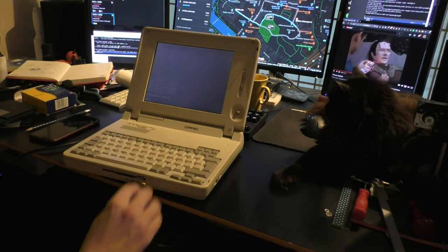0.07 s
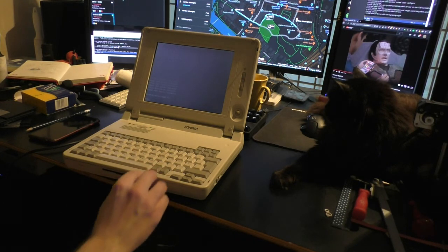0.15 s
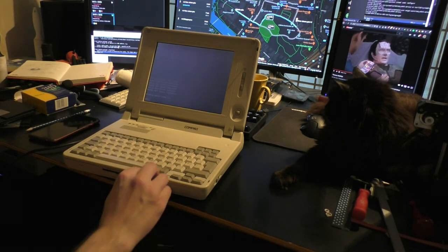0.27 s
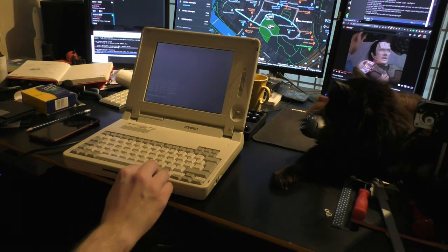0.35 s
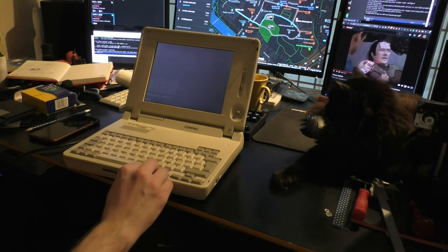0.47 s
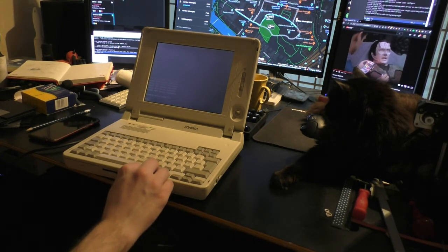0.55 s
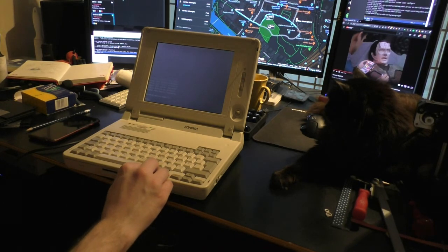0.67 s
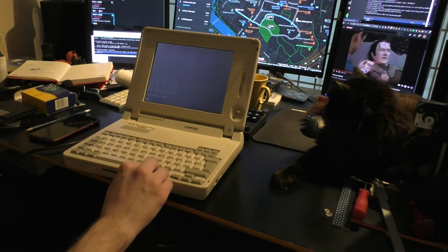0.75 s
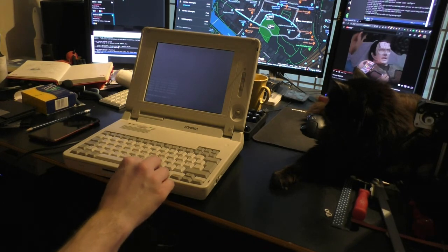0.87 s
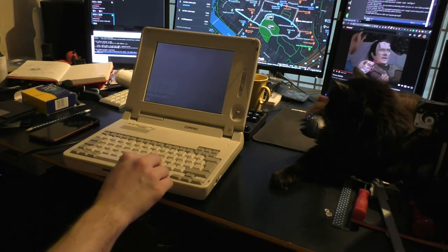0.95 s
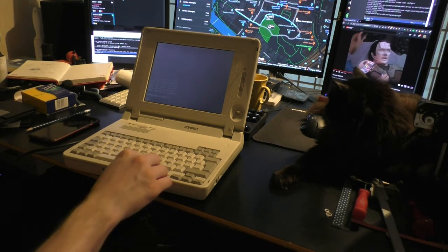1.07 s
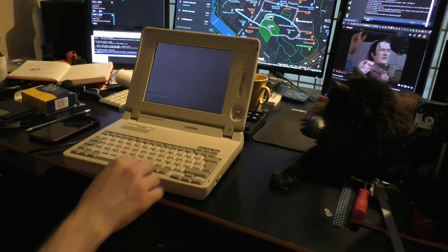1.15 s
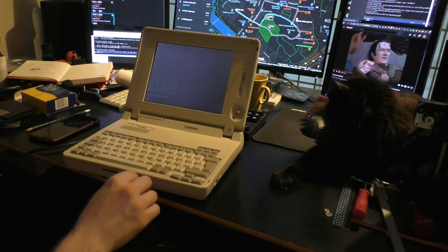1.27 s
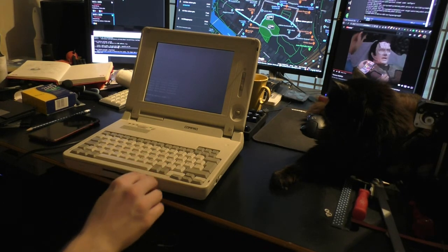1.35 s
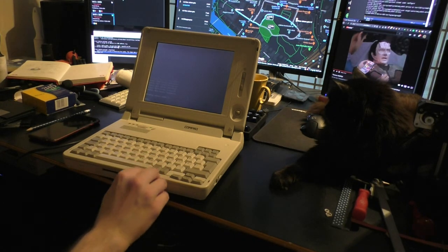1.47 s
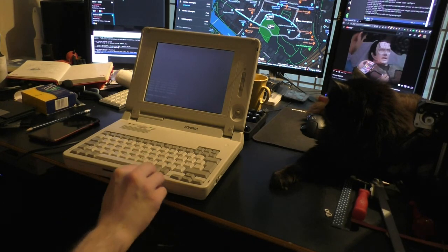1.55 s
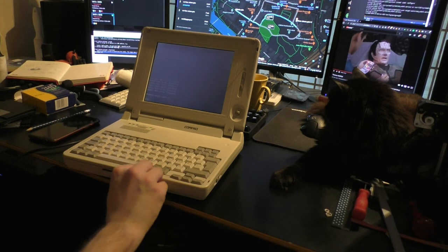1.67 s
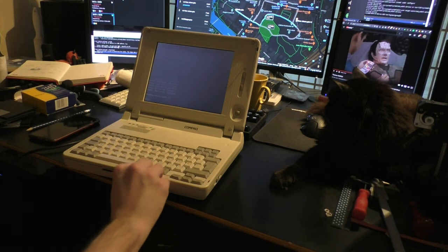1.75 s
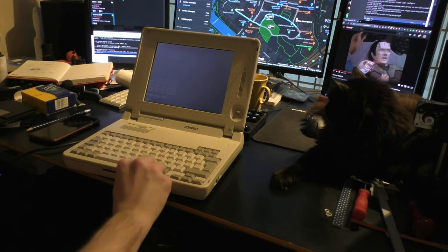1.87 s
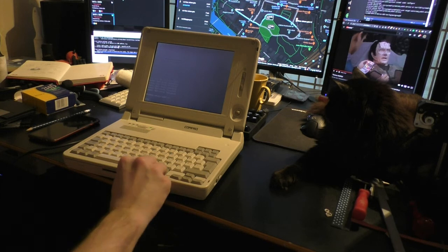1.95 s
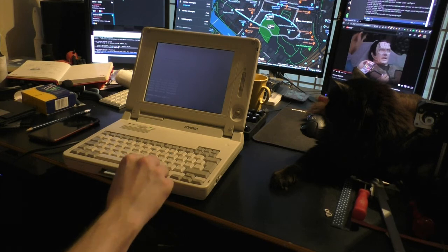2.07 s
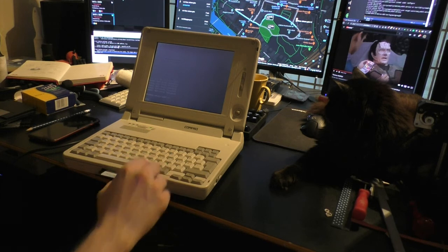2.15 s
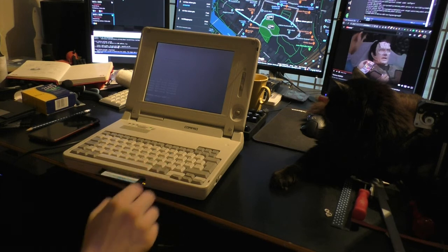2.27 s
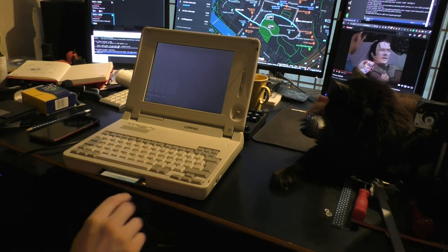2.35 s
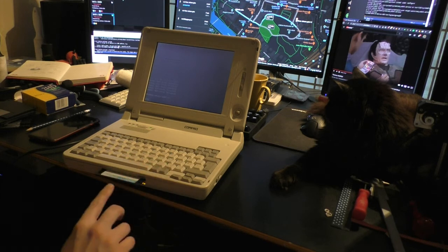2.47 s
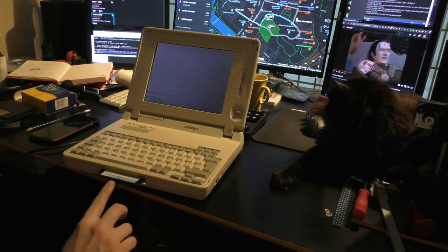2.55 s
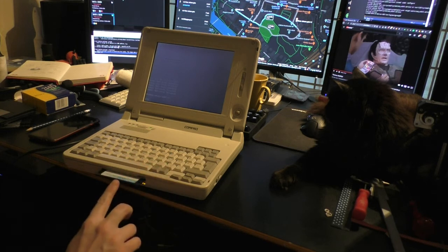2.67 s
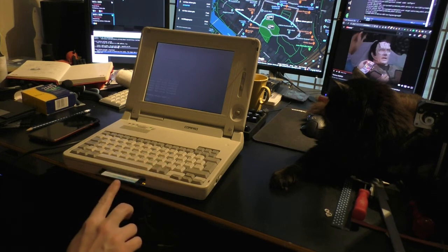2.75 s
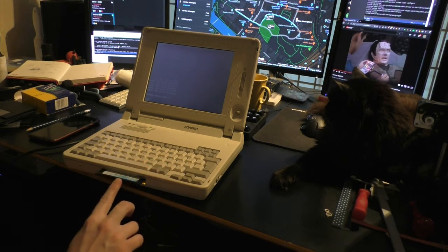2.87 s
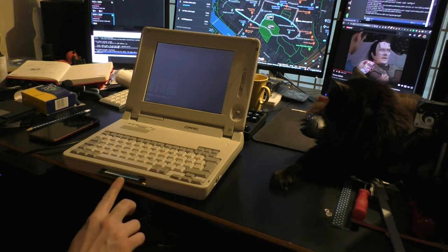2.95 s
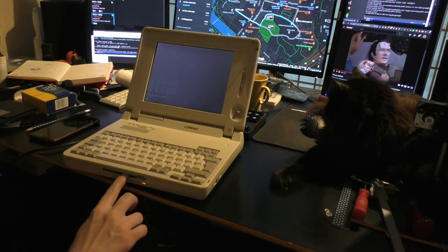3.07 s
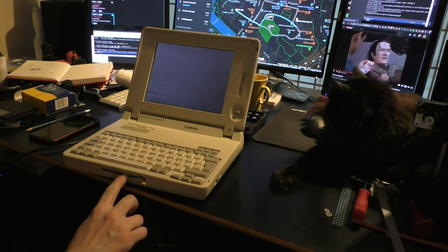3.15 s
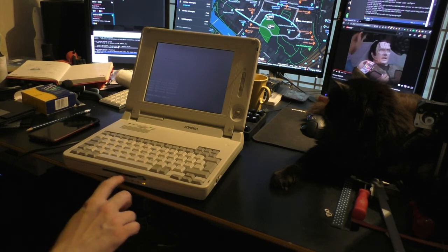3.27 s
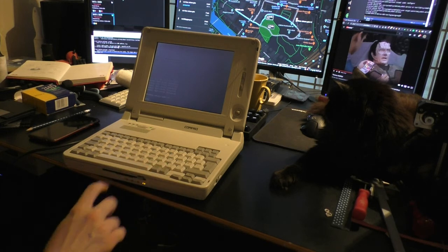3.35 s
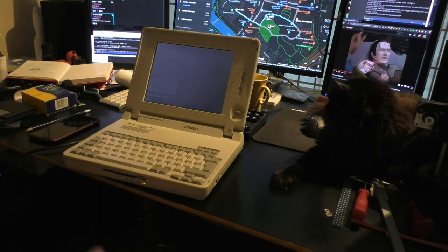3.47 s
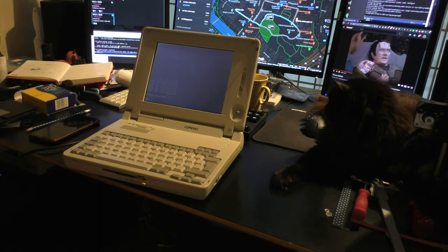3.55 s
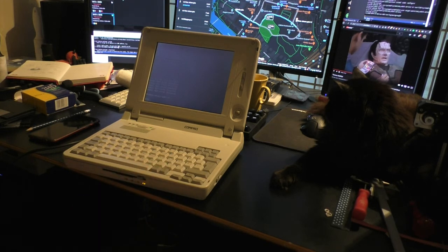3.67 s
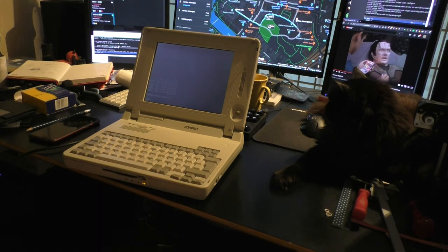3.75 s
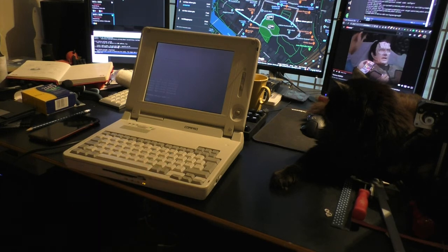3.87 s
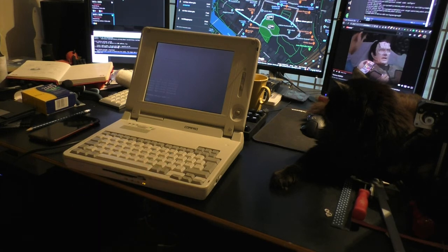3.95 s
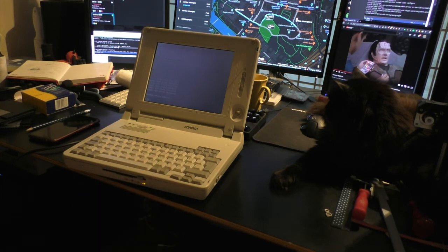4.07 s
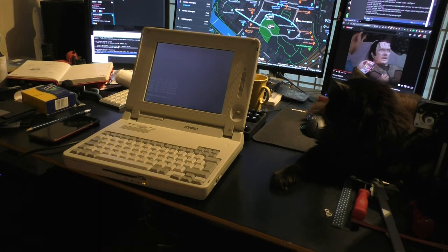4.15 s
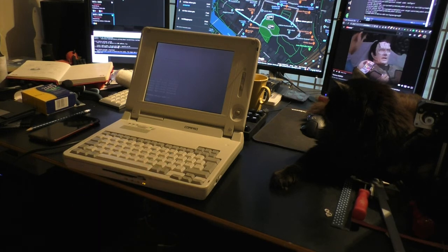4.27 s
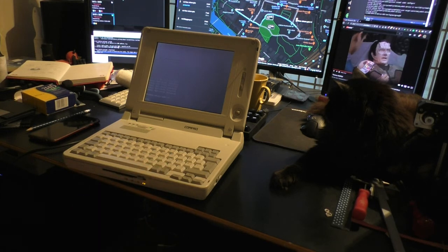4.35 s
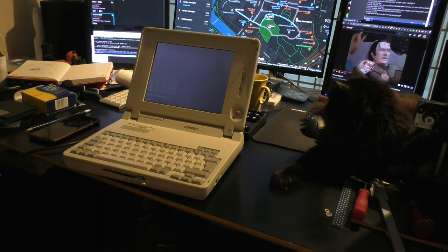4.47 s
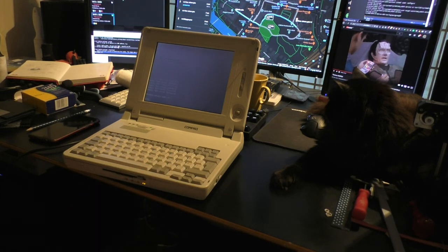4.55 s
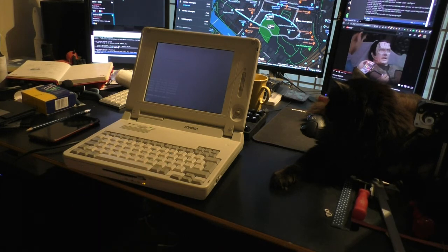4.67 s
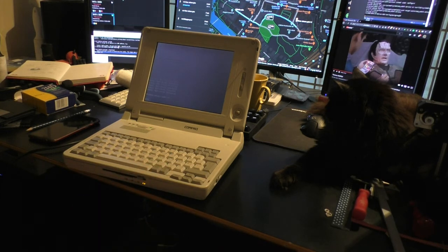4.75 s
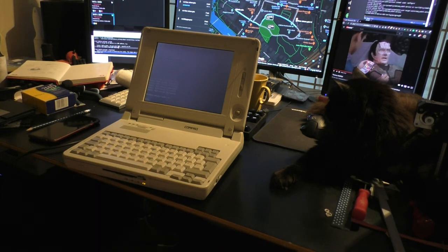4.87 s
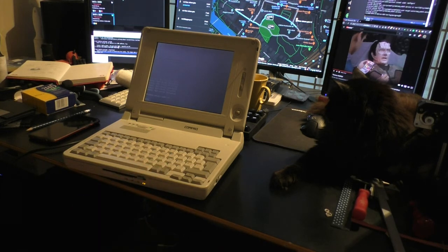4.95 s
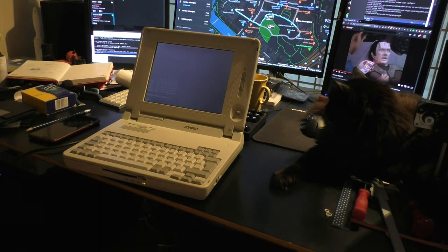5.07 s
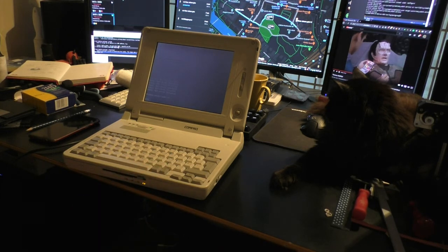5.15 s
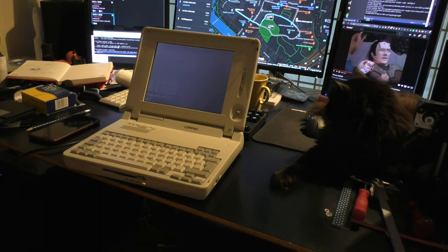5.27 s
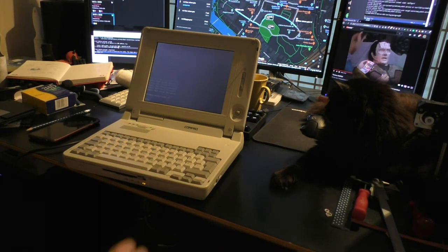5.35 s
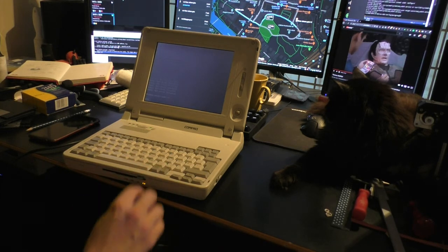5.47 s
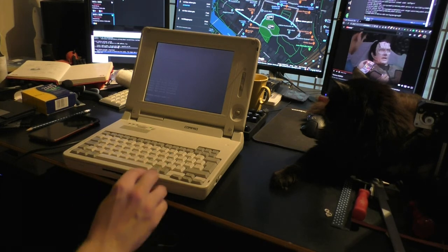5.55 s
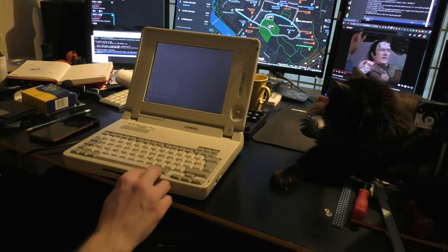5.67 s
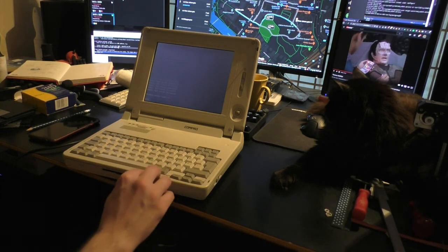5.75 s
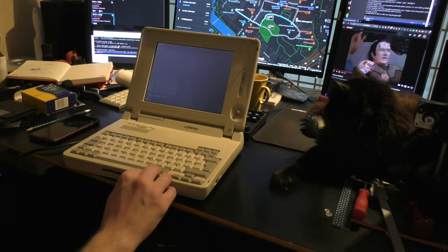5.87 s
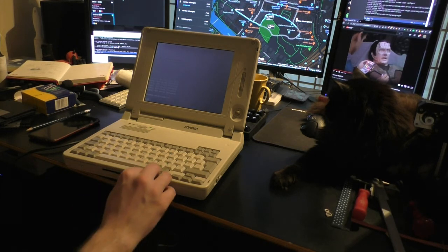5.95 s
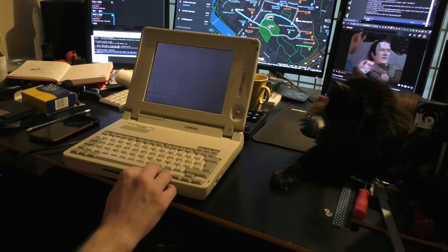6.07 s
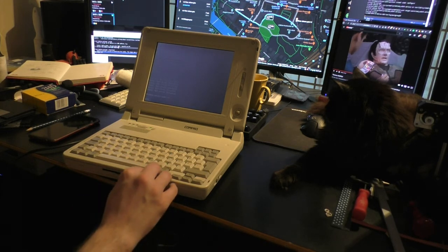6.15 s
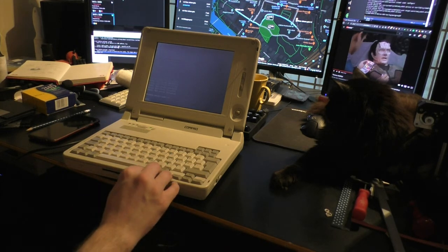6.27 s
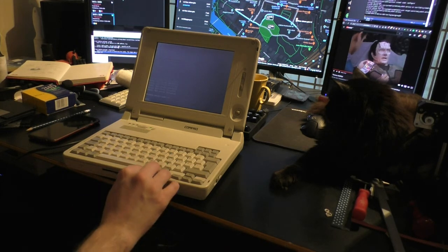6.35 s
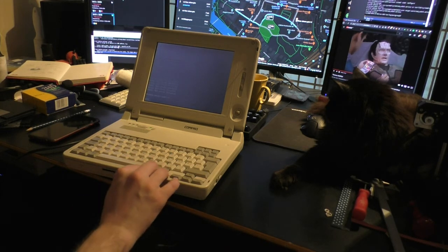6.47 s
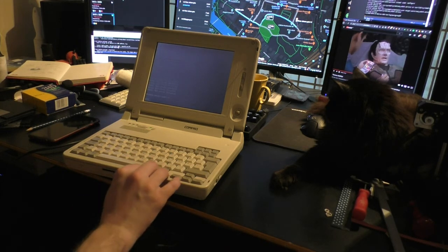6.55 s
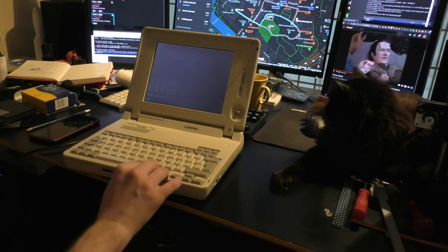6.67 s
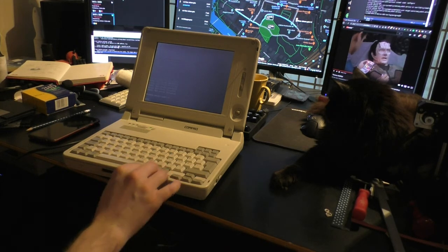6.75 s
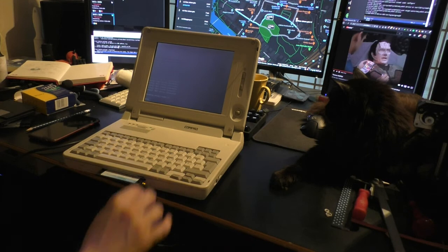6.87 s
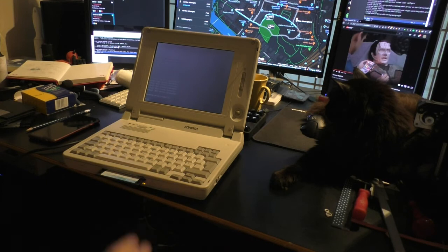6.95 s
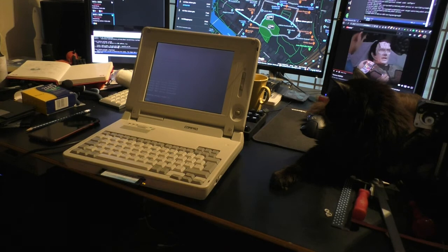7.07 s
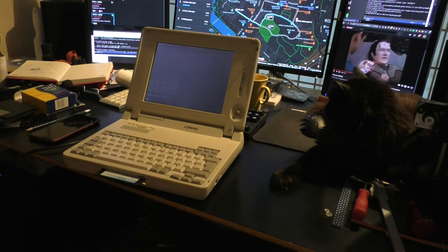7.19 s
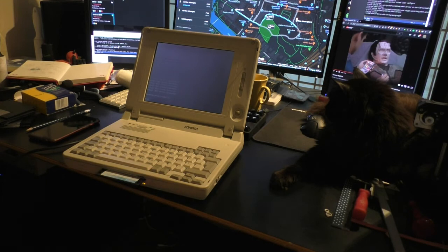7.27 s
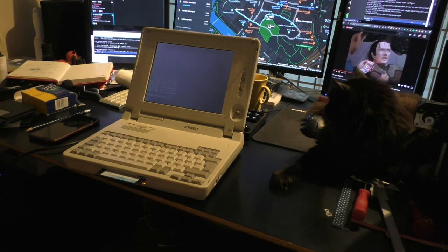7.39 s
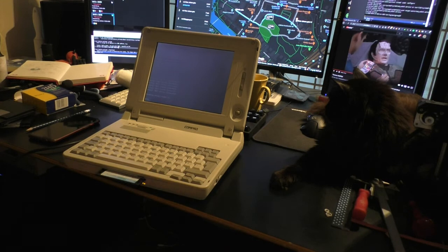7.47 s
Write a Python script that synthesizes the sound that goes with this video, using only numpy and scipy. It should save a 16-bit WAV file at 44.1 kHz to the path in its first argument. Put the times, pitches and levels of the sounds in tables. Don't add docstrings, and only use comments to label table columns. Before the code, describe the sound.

In a quiet room with soft fans, a close microphone catches an old laptop's floppy drive whining and rasping. It cuts off and coasts down after an eject; small clicks, a press and a short plastic slide follow. The disk is pushed back with a hard clack and desk thump, the drive whines and scrapes again for over three seconds, then stops with a click and a few light taps.

```python
import sys
import numpy as np
from scipy import signal
from scipy.fft import rfft, irfft, next_fast_len
from scipy.io import wavfile
from scipy.ndimage import uniform_filter1d

SR = 44100
rng = np.random.default_rng(int(sys.argv[2]) if len(sys.argv) > 2 else 0)


def amplitude_ratio(level_db):
    exponent = np.asarray(level_db, float) / 20
    return 10 ** exponent


def wrap_up_sound(samples):
    columns = np.atleast_2d(samples).T
    tamed = np.clip(columns, -1, 1)
    steps = np.round(tamed * 32767).astype(np.int16)
    wavfile.write(sys.argv[1], SR, steps)


N = 331632


def rms_one(x):
    return x / np.sqrt(np.mean(x ** 2) + 1e-20)


def at_hz(points, hz):
    table_hz, values = np.array(points)[:, :2].T
    return np.interp(np.log(hz + 1e-9), np.log(table_hz), values)


def drift(rate_hz):
    r = np.exp(-80 * np.pi * rate_hz / SR)
    slow = signal.lfilter([1], [1, -2 * r, r * r], rng.standard_normal(N // 40 + 2002))[2000:]
    return np.interp(np.arange(N) / 40, np.arange(len(slow)), rms_one(slow))


def colour(x, points, scale=1):
    gain = amplitude_ratio(scale * at_hz(points, np.fft.rfftfreq(N, 1 / SR)))
    return irfft(rfft(x) * gain, N)


def butter(x, order, hz, kind="low"):
    return signal.sosfilt(signal.butter(order, hz, kind, fs=SR, output="sos"), x)


def resonate(x, modes, patchy_db=0):
    out = np.zeros(N)
    for k, (hz, width, db) in enumerate(modes):
        r = np.exp(-np.pi * width / SR)
        poles = [1, -2 * r * np.cos(2 * np.pi * hz / SR), r * r]
        ring = signal.lfilter([(1 - r * r) / 2, 0, (r * r - 1) / 2], poles, x + 1e-18)
        out += (-1) ** k * amplitude_ratio(db + patchy_db * drift(7.9)) * ring
    return out


# (time [s], pole rate [Hz], whine level [dB])
SPINDLE = [(0, 713, -45), (.35, 716.2, -42.5), (.72, 706, -46), (.86, 707.4, -46), (3.2, 663, -59),
           (3.26, 667.6, -49), (3.33, 705.5, -42.5), (3.62, 706, -42), (3.75, 711, -43), (3.95, 701, -42.5),
           (4.1, 710, -41), (4.3, 691.5, -42), (4.53, 714.3, -42), (4.68, 696, -41.5), (4.9, 725, -45),
           (5.2, 721, -45), (5.55, 707.8, -39.5), (6.57, 700.8, -44.5)]
# (from [s], to [s])
CURRENT = [
    (-1, .862),
    (3.2, 6.572),
]
# (time [s], loss [dB])
FALTERS = [
    (.73, 6.5),
    (5.17, 8.9),
    (6.19, 2.1),
]


def motor():
    t = np.arange(N) / SR
    s, table_hz, table_db = np.transpose(SPINDLE)
    turning = (t >= s[0]) & (t <= s[-1])
    pole_hz = np.where(turning, np.interp(t, s, table_hz), 662)
    whine_db = np.where(turning, np.interp(t, s, table_db), -130)
    live = sum(1. * ((t > on) & (t < off)) for on, off in CURRENT)
    whine_db = whine_db + 20 * np.log10(uniform_filter1d(live, size=500) + 1e-5)
    half_width_s = 0.015
    whine_db -= sum(db * np.exp(-((t - at) / half_width_s) ** 2) for at, db in FALTERS)
    return pole_hz, whine_db


JITTER_DB = [-56, -52.5, -52.5]
# (from [s], to [s], third partial [dB], fourth partial [dB])
SINGING = [(0.076, 0.113, -55, -46), (0.244, 0.322, -47, -46), (0.574, .63, -51, -48),
           (.75, 0.826, -45.5, -45), (3.198, 3.4, -46, -48.5), (3.396, 3.665, -45.5, -45.5),
           (3.72, 3.82, -46.5, -44.5), (3.887, 4.298, -48, -51), (4.329, 4.5, -45.5, -48),
           (4.557, 4.7, -47, -56), (5.45, 5.621, -50.5, -52), (5.74, 5.94, -51.5, -51),
           (6.32, 6.422, -45.5, -47), (6.484, 6.575, -47, -49)]


def partials(whine_db):
    t = np.arange(N) / SR
    edge_s, second_under_third_db = 0.01, 6.5
    second, third, fourth = [np.full(N, float(db)) for db in JITTER_DB]
    for start, end, third_db, fourth_db in SINGING:
        true = np.clip(np.minimum(t - start, end - t) / edge_s + .5, 0, 1)
        second += true * (third_db - second_under_third_db - JITTER_DB[0])
        third += true * (third_db - JITTER_DB[1])
        fourth += true * (fourth_db - JITTER_DB[2])
    dead = np.minimum(whine_db + 55, 0)
    singing_db = third - JITTER_DB[1]
    return second + dead, third + dead, fourth + dead, singing_db


# (from [s], pole rate [Hz], slowing time constant [s], level [dB])
COASTING = [
    (.862, 660, .24, -56),
    (6.575, 600, .17, -51),
]


def coasting():
    t, hz, db = np.arange(N) / SR, np.full(N, 400.), np.full(N, -120.)
    peak_s, rise_db, fade_db_per_s = .05, 7, 220
    for start, start_hz, slow_s, top_db in COASTING:
        age = t - start
        on = (age >= 0) & (age < .25)
        hz = np.where(on, start_hz * np.exp(-np.maximum(age, 0) / slow_s), hz)
        rise = rise_db * (age / peak_s - 1)
        fade = -fade_db_per_s * (age - peak_s)
        db = np.where(on, top_db + np.minimum(rise, fade), db)
    return hz, db


# (multiple of the pole rate, level against third and fourth [dB])
HIGH_PARTIALS = [(5, -7), (6, -15), (7, -19)]
# (eighths of the pole rate, level against the third [dB])
SHAFT_ORDERS = [(17, -7), (21, -11), (22, -13), (25, -11), (29, -10), (37, -14)]


def whine(turn, whine_db, second_db, third_db, fourth_db):
    out = amplitude_ratio(whine_db + 0.72 * drift(29)) * np.sin(turn + 0.14 * drift(20))
    out += amplitude_ratio(third_db / 2 - 35 + 2 * drift(6)) * np.sin(1.5 * turn + .25 * drift(15))
    out += amplitude_ratio(second_db + 2.0 * drift(25)) * np.sin(2 * turn + .2 * drift(18))
    out += amplitude_ratio(third_db + 2.2 * drift(25)) * np.sin(3 * turn + .25 * drift(18))
    out += amplitude_ratio(fourth_db + 2.5 * drift(25)) * np.sin(4 * turn + .4 * drift(18))
    for k, db in HIGH_PARTIALS:
        level_db = (third_db + fourth_db) / 2 + db
        out += amplitude_ratio(level_db + 2.5 * drift(15)) * np.sin(k * turn + .5 * drift(20))
    fade = 1.5 * np.minimum(third_db + 45, 0)
    for eighths, db in SHAFT_ORDERS:
        level_db = third_db + db + fade
        out += amplitude_ratio(level_db + 1.5 * drift(15)) * np.sin(eighths / 8 * turn + .3 * drift(15))
    coast_hz, coast_db = coasting()
    coast_turn = 2 * np.pi * np.cumsum(coast_hz) / SR
    out += amplitude_ratio(coast_db + 2.5 * drift(40)) * np.sin(coast_turn + .6 * drift(40))
    return np.sqrt(2) * out


CLAMPED_S = [
    -2.5,
    3.105,
]
# (time [s], dying rate [dB/s])
LIFTS = [
    (.9, 85),
    (6.63, 119),
]
# (shortfall [dB], time constant [s])
SETTLING = [
    (4.64, 0.23),
    (22, 0.38),
    (14, 0.14),
]


def contact(singing_db):
    t, out = np.arange(N) / SR, np.full((3, N), -130.)
    full_db = np.array([[-41], [-48.5], [-52]])
    dies = np.array([[1], [0], [2.9]])
    short_db, settle_s = np.transpose(SETTLING)[:, :, None]
    for seated, (lifted, dying), (_, cut) in zip(CLAMPED_S, LIFTS, CURRENT):
        age = np.maximum(t - seated, 0)
        gone = dying * np.maximum(t - lifted, 0)
        db = full_db - short_db * np.exp(-age / settle_s) - gone * dies
        db[1] -= 150 * np.maximum(t - cut, 0)
        db[2] -= 2 * np.clip((t - lifted) / 0.98 + 1, 0, 1)
        out = np.where(t > seated, np.maximum(db, out), out)
    out[0] -= .3 * singing_db
    out[1] += 1.2 * drift(3) - 0.48 * singing_db
    return out


# (frequency [Hz], width [Hz], level [dB])
FRAME_MODES = [(1325, 35, -6), (1430, 50, -8), (1750, 45, -6), (1925, 50, -6), (2250, 70, -12),
               (2398, 28, 2), (2547, 28, 1), (2720, 60, -10), (2930, 60, -8), (3150, 70, -9),
               (3340, 50, -8), (3590, 60, -7), (5110, 200, -16), (6500, 300, -20)]
# (frequency [Hz], width [Hz], level [dB])
PLATE_MODES = [(1050, 36, 7), (1088, 68, 5), (1150, 76, 0.5)]
# (frequency [Hz], width [Hz], level [dB])
DESK_HUM_MODES = [(124, 14, 2), (200, 45, -4), (370, 18, -1), (536, 28, -5)]
# (frequency [Hz], density [dB per Hz])
RASP_SPECTRUM = [(900, -58), (1100, -24), (1600, -11), (2500, -8.5), (3600, -11.5), (5000, -17),
                 (7500, -26.5), (9000, -29.5)]
# (frequency [Hz], density [dB per Hz])
HISS_SPECTRUM = [(4500, -17), (5500, -19), (6500, 9.5), (7600, -1.5), (9000, -2), (11000, 0.5),
                 (14000, -0.5), (16500, -21)]


def rub(turn, singing_db):
    rasp_db, plate_db, hiss_db = contact(singing_db)
    sizes = amplitude_ratio(0.9 * np.minimum(rng.exponential(1, N), 5)) * rng.choice([-1, 1], N)
    strikes = rng.random(N) < 6000 / SR
    grains = sizes * strikes * (1 + 0.033 * np.cos(turn / 2)) * amplitude_ratio(0.98 * drift(13.7))
    rasp = resonate(grains, FRAME_MODES, patchy_db=2.5) + amplitude_ratio(1.5) * colour(grains[::-1], RASP_SPECTRUM)
    rasp = rms_one(butter(rasp, 6, 1000, "high"))
    plate = rms_one(butter(resonate(grains, PLATE_MODES, patchy_db=0.5), 6, 1000, "high"))
    hump_hz = 11430 + 301 * drift(1.5)
    band = rms_one(butter(rng.standard_normal(N), 2, 900))
    hump = band * np.cos(2 * np.pi * np.cumsum(hump_hz) / SR)
    hiss = rms_one(rms_one(colour(grains, HISS_SPECTRUM)) + amplitude_ratio(-2.5) * hump)
    hum = amplitude_ratio(-21.0) * rms_one(resonate(grains, DESK_HUM_MODES, patchy_db=-0.5))
    return amplitude_ratio(rasp_db) * (rasp + hum) + amplitude_ratio(plate_db) * plate + amplitude_ratio(hiss_db) * hiss


# (time [s], peak level [dB], shell centre [Hz], t60 [s])
FINGER_PRESSES = [(1.447, -50, 1220, .11), (1.825, -42, 945, 0.16), (1.87, -32, 1270, 0.035),
                  (3.095, -19.5, 1530, 0.035), (3.144, -41, 1329, .15), (6.821, -45, 1780, 0.14)]
DISK_CLACKS = [(1.875, -24.5, 1000, 0.061), (1.882, -28.5, 2100, 0.049), (1.879, -30, 3700, 0.053),
               (2.138, -41, 3470, 0.043), (2.908, -43, 1050, 0.06), (2.932, -39.5, 1600, 0.17),
               (3.053, -38, 1150, .067), (3.071, -29.5, 1840, 0.088), (3.092, -17, 3140, 0.05),
               (6.888, -58, 1350, .097), (7.097, -46.5, 1890, .04)]
EJECT_LEVER = [(1.016, -38.5, 1050, 0.19), (1.741, -35, 1730, 0.096), (1.888, -39.5, 2540, 0.27),
               (2.017, -39.5, 2880, 0.022), (2.023, -42.5, 2030, .21), (2.096, -45.5, 1080, 0.43),
               (6.615, -40.5, 2400, 0.21), (6.625, -27.5, 2280, 0.05)]
SHUTTER_SNAPS = [(2.13, -31, 2270, 0.14), (3.086, -15.5, 1340, 0.058), (3.117, -34, 1310, 0.26),
                 (6.596, -44, 2690, 0.041), (6.858, -34, 2060, 0.19)]
SOFT_TAPS = [(0.926, -39, 1300, 0.21), (1.573, -44.5, 1110, 0.2), (2.867, -46, 1830, 0.43),
             (7.231, -43, 1010, 0.085), (7.237, -40.5, 1230, 0.12)]
# (treble level [dB], bass level [dB])
KIND_COLOURS = [
    (-14.5, -8.5),
    (-15.5, -27),
    (-9.5, -15),
    (-2, -24.5),
    (-26, -10.5),
]


def strikes_on_case(contacts, flip):
    shell, crack, desk = np.zeros((3, N))
    t = np.arange(SR // 2) / SR
    kinds = [FINGER_PRESSES, DISK_CLACKS, EJECT_LEVER, SHUTTER_SNAPS, SOFT_TAPS]
    for rows, (treble_db, bass_db) in zip(kinds, KIND_COLOURS):
        for s, db, centre_hz, t60 in rows:
            at, t60 = round(s * SR), max(t60, .01)
            span = slice(at, at + len(t))
            attack = np.minimum(t * SR / 20, 1) * (1 + 0.49 * np.exp(-t / 0.0019))
            decay = amplitude_ratio(db - 60 * np.maximum(t / t60 - .06, 0))
            rattle = (attack * decay)[:N - at] * contacts[span]
            struck_part = butter(rattle, 2, [centre_hz / 1.94, centre_hz * 1.43], "band")
            shell[span] += struck_part * np.sqrt(8000 / centre_hz)
            crack[span] += rattle * amplitude_ratio(treble_db) * flip[span]
            desk[span] += rattle * amplitude_ratio(bass_db)
    return shell, crack, desk


# (from [s], to [s], level [dB], relative treble [dB])
SLOT_SLIDES = [
    (2.074, 2.125, -55, -7),
    (2.974, 3.078, -64, 1),
    (6.799, 6.87, -54.5, -3.5),
]


def slides(contacts, flip):
    shell, crack = np.zeros((2, N))
    for start, end, db, treble_db in SLOT_SLIDES:
        corners_s = [start, start + 0.33 * (end - start), end, end + 0.0029]
        stroke = np.interp(np.arange(N) / SR, corners_s, [0.01, 0.93, 1, 0.012])
        shell += amplitude_ratio(db + 17.5 + 2.0 * drift(60)) * stroke * contacts
        crack += amplitude_ratio(db + 10 + treble_db) * stroke * contacts * flip
    return shell, crack


# (time [s], level [dB])
DESK_BLOWS = [
    (1.574, 1),
    (1.877, 7),
    (2.133, 1),
    (3.094, 22.5),
    (3.132, 19.5),
    (7.233, -4),
]
# (frequency [Hz], width [Hz], level [dB])
DESK_TOP_MODES = [(95.5, 21, -18.5), (127.6, 9.9, 0), (174, 66, -16.5), (246, 71, -10.5)]


def thumps():
    push = np.zeros(N)
    for s, db in DESK_BLOWS:
        push[round(s * SR)] = amplitude_ratio(db)
    return resonate(butter(push + 1e-18, 2, 300), DESK_TOP_MODES)


# (frequency [Hz], width [Hz], level [dB])
SHELL_MODES = [(1030, 130, -1), (1270, 170, -2), (1730, 200, -3), (2090, 250, -1), (2450, 250, -2),
               (2900, 250, -1), (3330, 250, 0), (3800, 300, 0), (4400, 400, -3), (4850, 400, -4)]
# (frequency [Hz], width [Hz], level [dB])
DESK_MODES = [(188, 15, -2), (310, 85, -10.5), (380, 57, 5), (420, 180, 0), (680, 86, -4)]


def knocks():
    contacts = rng.standard_normal(N) * amplitude_ratio(3 * rng.standard_normal(N) + 1)
    flip = rng.choice([-1, 1], N)
    shell, crack, desk = strikes_on_case(contacts, flip)
    slide_shell, slide_crack = slides(contacts, flip)
    shell, crack = shell + slide_shell, crack + slide_crack
    broad = butter(shell, 2, [800, 5000], "band")
    crack = butter(butter(crack, 2, 3200, "high"), 1, 14000) * amplitude_ratio(1.5)
    out = amplitude_ratio(-1.5) * resonate(shell, SHELL_MODES) + amplitude_ratio(-17.5) * broad + amplitude_ratio(-5.5) * crack
    return out + amplitude_ratio(16.0) * resonate(desk, DESK_MODES) + thumps()


# (frequency [Hz], t60 [s])
ROOM_DECAY = [(100, 0.89), (1000, 0.61), (5000, 0.27), (15000, 0.062)]


def room(x):
    size = next_fast_len(N + SR)
    hz = np.fft.rfftfreq(size, 1 / SR)
    t60, sides = at_hz(ROOM_DECAY, hz), np.zeros((2, len(hz)), complex)
    for k, lag in enumerate(rng.uniform(.009, .035, 20)):
        echo = amplitude_ratio(-60 * lag / t60) * np.exp(-2j * np.pi * hz * lag)
        sides[k % 2] += echo / (1 - echo) * (-1) ** (k // 2)
    return irfft(rfft(x, size) * sides, size)[:, :N]


# (frequency [Hz], rms level [dB])
HARD_DISK_LINES = [(1211, -77), (1443, -73.5), (2396, -80), (2950, -90), (3015, -73), (3354, -75),
                   (4134, -75), (4172, -89), (4328, -96), (4441, -71.5), (4716, -78), (5254, -82),
                   (5523, -100), (6605, -81)]


def hard_disk():
    t, out = np.arange(N) / SR, np.zeros(N)
    fade_db = 4 * np.clip(t - 6, 0, 1)
    for hz, db in HARD_DISK_LINES:
        level = amplitude_ratio(db + 3 - fade_db + 1.5 * drift(1.5))
        out += level * np.sin(2 * np.pi * hz * t + .6 * drift(1.5))
    return out * amplitude_ratio([[2.5], [-2.5]])


# (frequency [Hz], density [dB per Hz])
FLOOR_SPECTRUM = [(20, -10), (45, -10), (120, -4.5), (290, -6.5), (480, -12), (600, -22), (800, -20.5),
                  (900, -12), (1400, -13.5), (2500, -21), (4300, -19), (5500, -26.5), (7500, -35.5),
                (13000, -28), (16000, -34)]
# (frequency [Hz], likeness [0-1])
SIDE_LIKENESS = [(60, 0.26), (180, 0.22), (550, 0.75), (1650, 0.68), (4970, 0.54), (15000, 0.44)]
# (frequency [Hz], left minus right [dB])
SIDE_BALANCE = [(60, -2.5), (180, -1.5), (550, 1), (1650, 1), (4970, 1.5), (15000, -0.5)]


def fan_floor():
    hz = np.fft.rfftfreq(N, 1 / SR)
    alike = np.clip(at_hz(SIDE_LIKENESS, hz), 0, 1)
    spectrum = amplitude_ratio(at_hz(FLOOR_SPECTRUM, hz))
    mid, side = rfft(rng.standard_normal((2, N))) * spectrum
    tilt = amplitude_ratio(at_hz(SIDE_BALANCE, hz) * [[.5], [-.5]])
    noise = irfft(tilt * (np.sqrt(1 + alike) * mid + np.sqrt(1 - alike) * side * [[1], [-1]]), N)
    return amplitude_ratio(-57) * noise / np.sqrt(np.mean(noise.mean(axis=0) ** 2))


# (frequency [Hz], left minus right [dB])
NEAR_BALANCE = [(60, 14), (130, -6), (290, -10.5), (640, 2.5), (1410, 8.5), (3100, 7), (6820, 1),
                (15000, 12)]


def scene():
    pole_hz, whine_db = motor()
    *upper_db, singing_db = partials(whine_db)
    turn = 2 * np.pi * np.cumsum(pole_hz + 2.0 * drift(4.91)) / SR
    tone = whine(turn, whine_db, *upper_db)
    noise = rub(turn, singing_db)
    hits = knocks()
    near = tone + noise + hits
    direct = np.array([colour(near, NEAR_BALANCE, scale=0.22), colour(near, NEAR_BALANCE, scale=-0.47)])
    echoes = room(amplitude_ratio(-26) * tone + amplitude_ratio(-16) * noise + amplitude_ratio(-17) * hits)
    return direct + echoes + hard_disk() + fan_floor()


def roll_off(x):
    return signal.sosfilt(signal.butter(12, 16690, fs=SR, output="sos"), x)


def record(dry):
    steep = signal.ellip(12, .5, 70, 15740, fs=SR, output="sos")
    return roll_off(signal.sosfilt(steep, dry))


dry = scene()
out = record(dry)
wrap_up_sound(out)
```